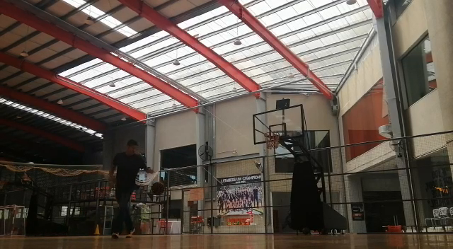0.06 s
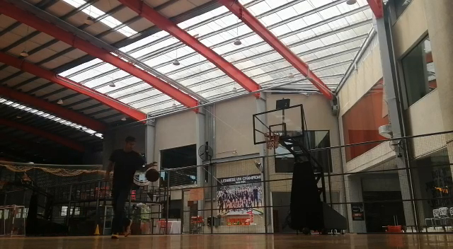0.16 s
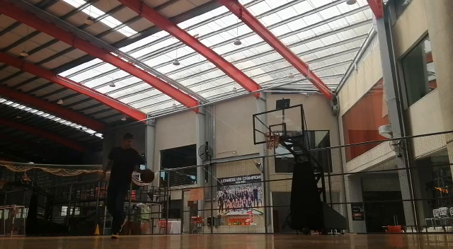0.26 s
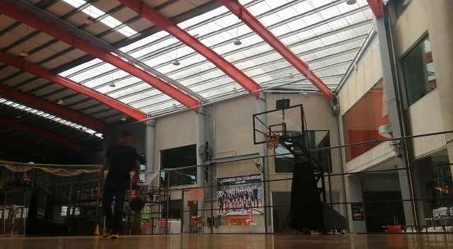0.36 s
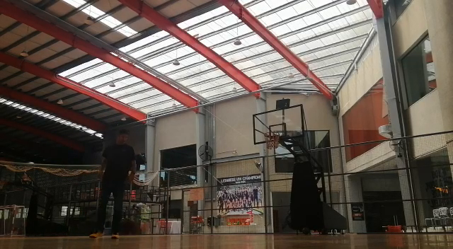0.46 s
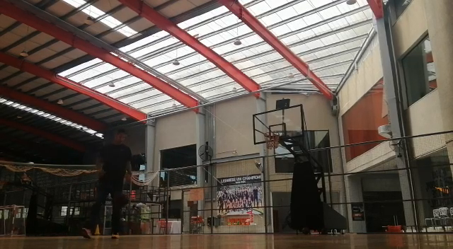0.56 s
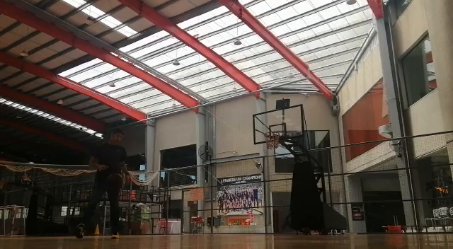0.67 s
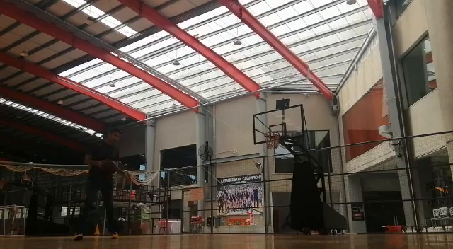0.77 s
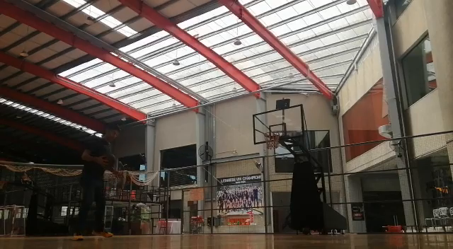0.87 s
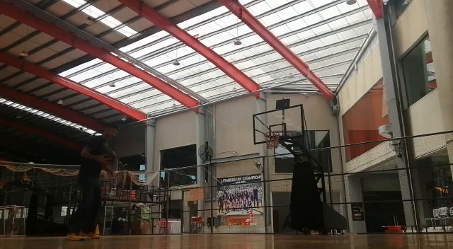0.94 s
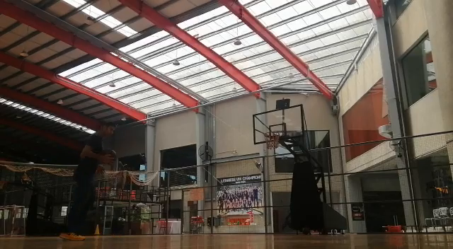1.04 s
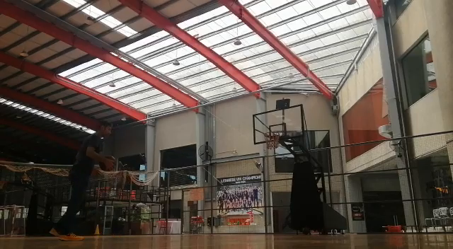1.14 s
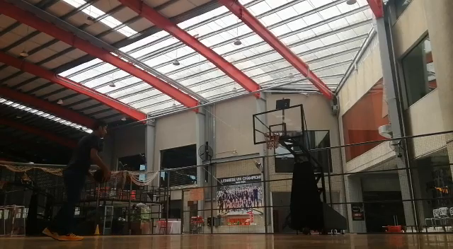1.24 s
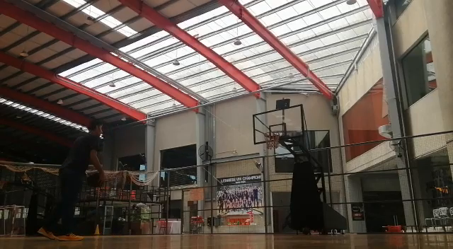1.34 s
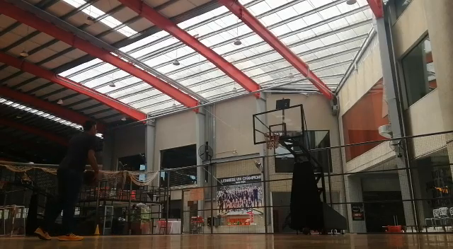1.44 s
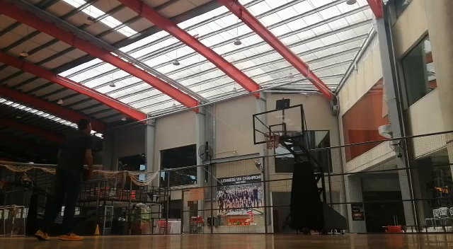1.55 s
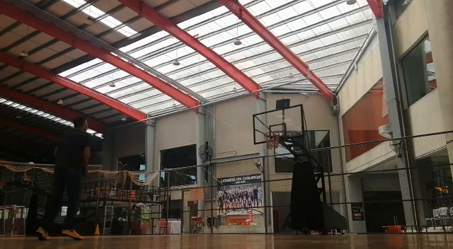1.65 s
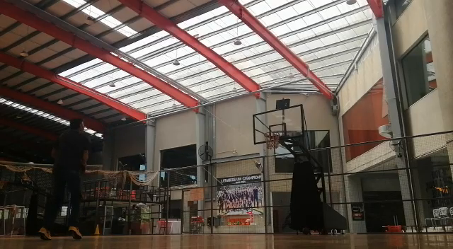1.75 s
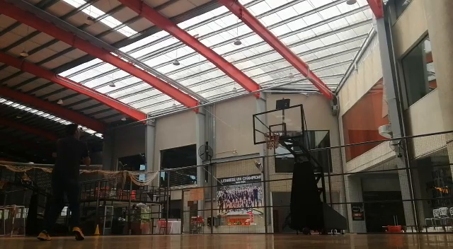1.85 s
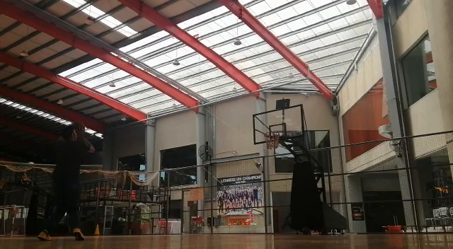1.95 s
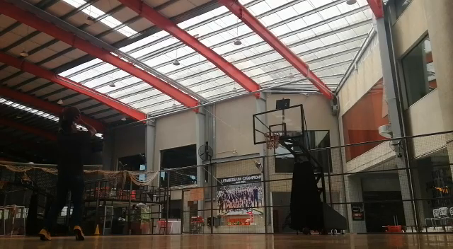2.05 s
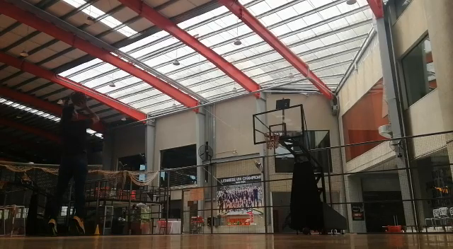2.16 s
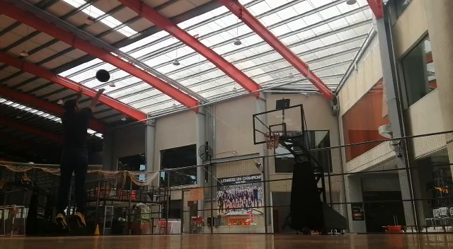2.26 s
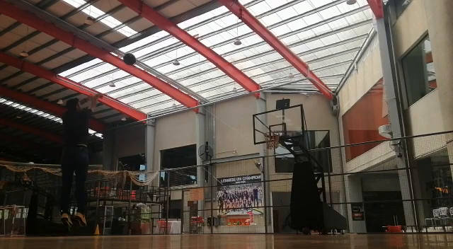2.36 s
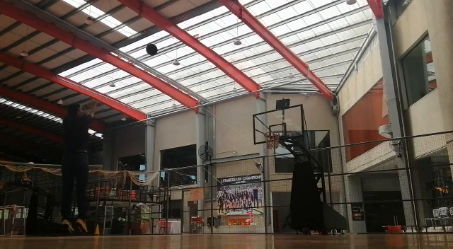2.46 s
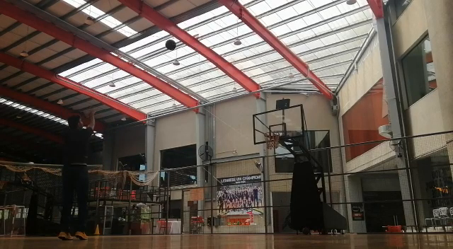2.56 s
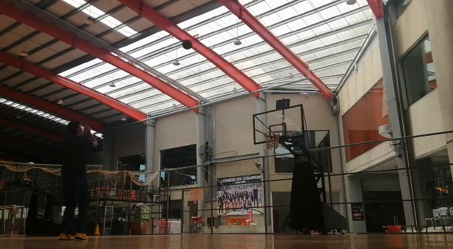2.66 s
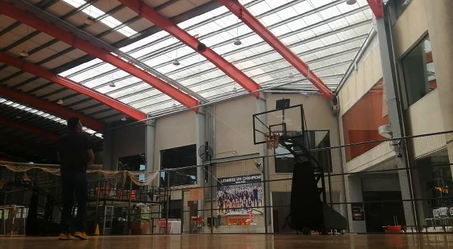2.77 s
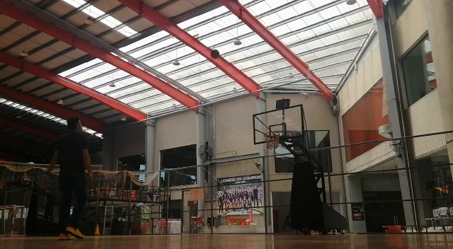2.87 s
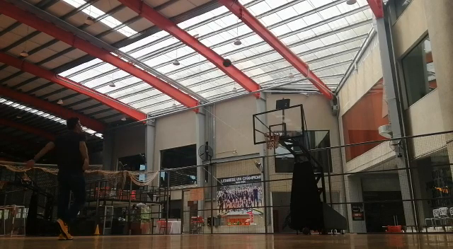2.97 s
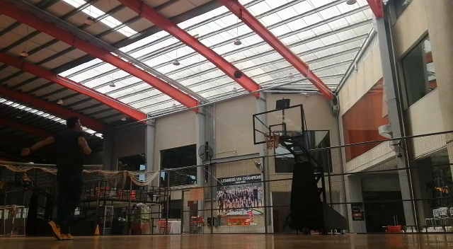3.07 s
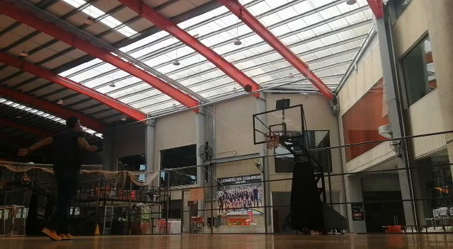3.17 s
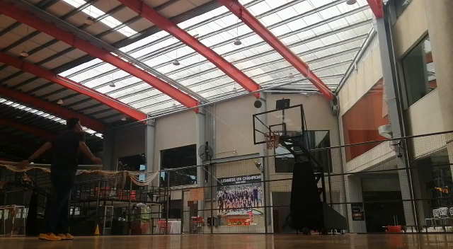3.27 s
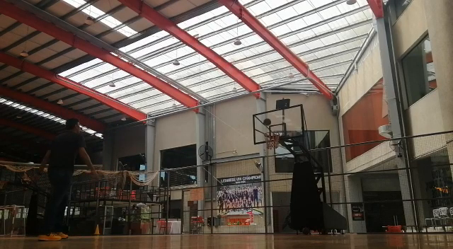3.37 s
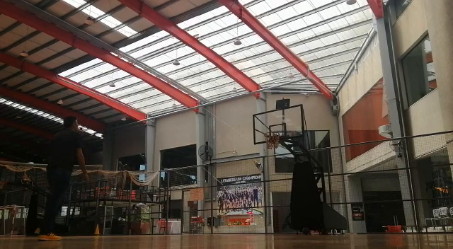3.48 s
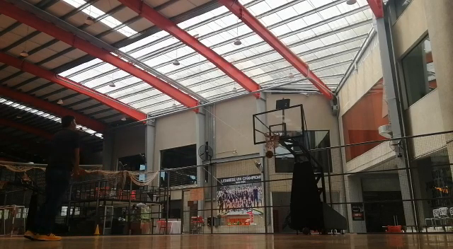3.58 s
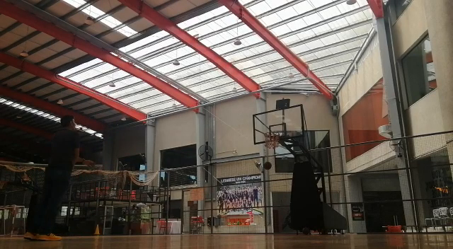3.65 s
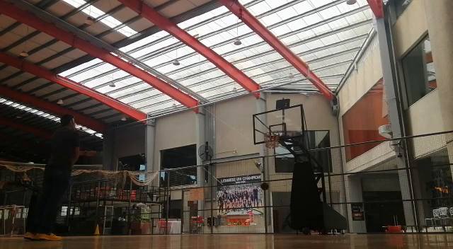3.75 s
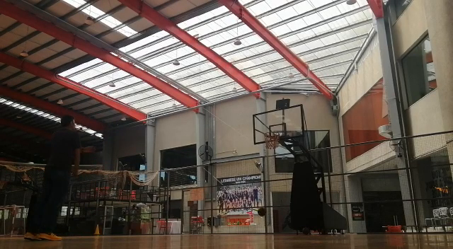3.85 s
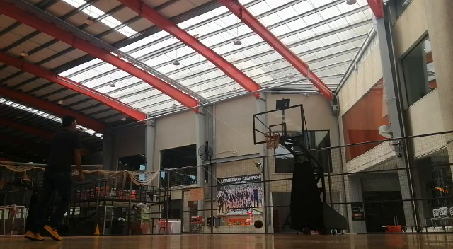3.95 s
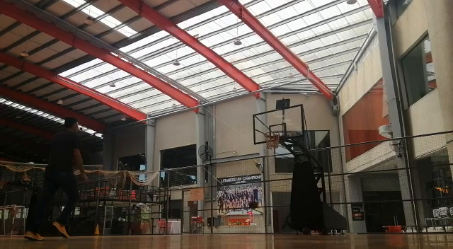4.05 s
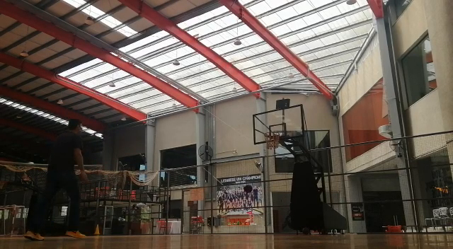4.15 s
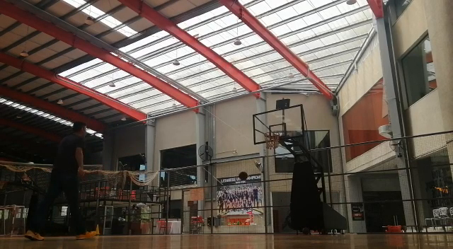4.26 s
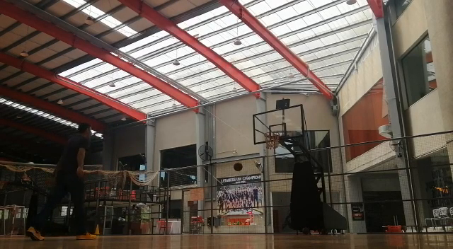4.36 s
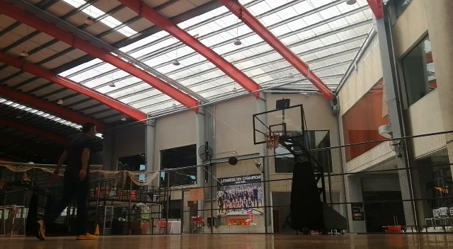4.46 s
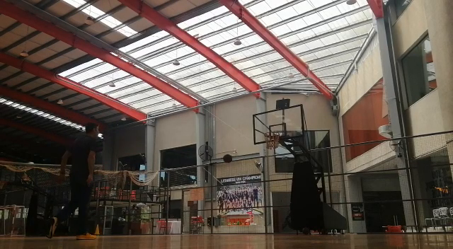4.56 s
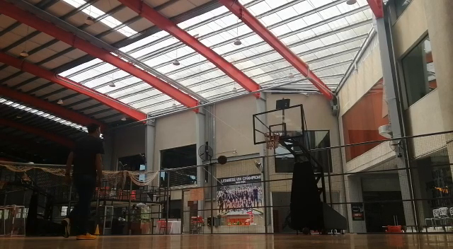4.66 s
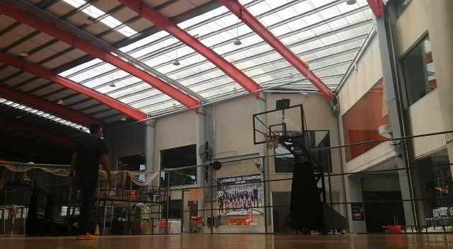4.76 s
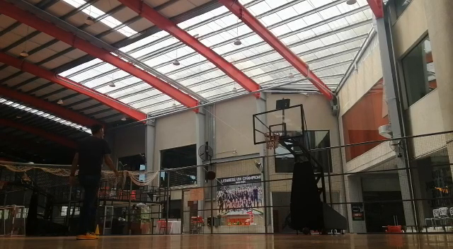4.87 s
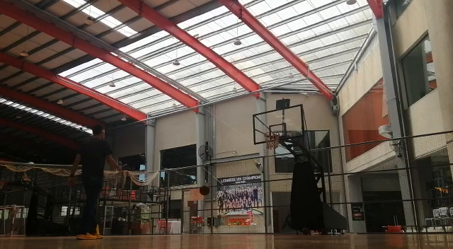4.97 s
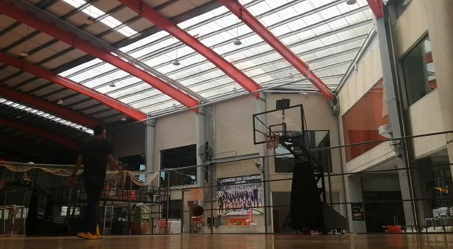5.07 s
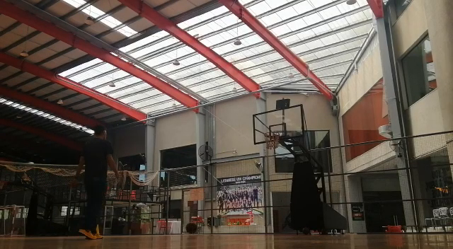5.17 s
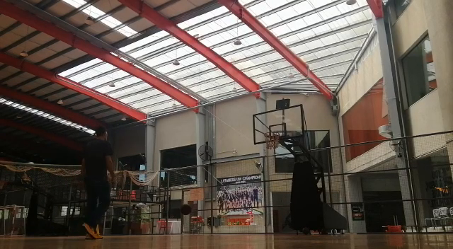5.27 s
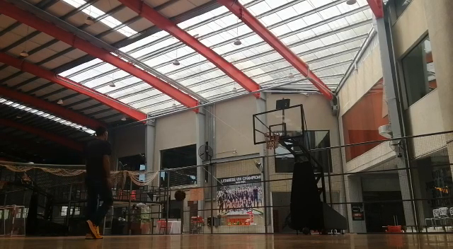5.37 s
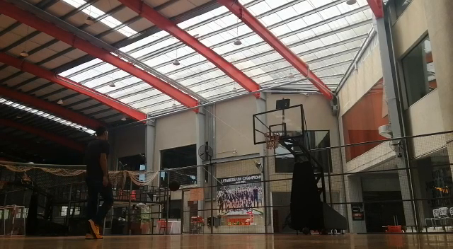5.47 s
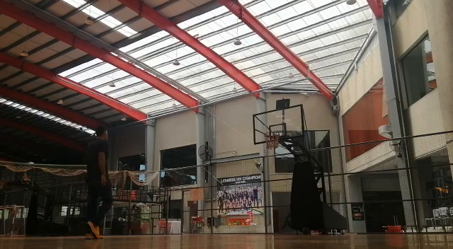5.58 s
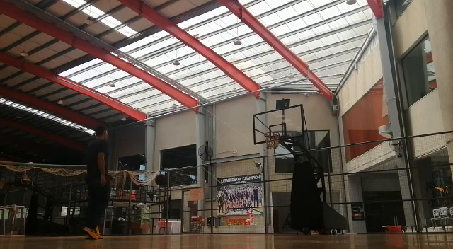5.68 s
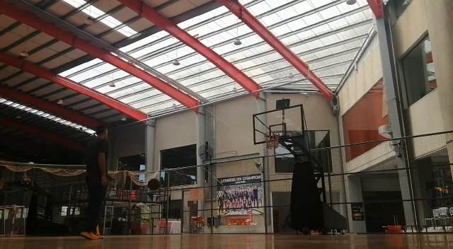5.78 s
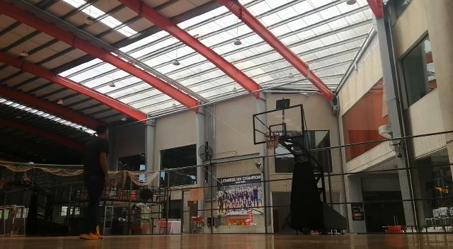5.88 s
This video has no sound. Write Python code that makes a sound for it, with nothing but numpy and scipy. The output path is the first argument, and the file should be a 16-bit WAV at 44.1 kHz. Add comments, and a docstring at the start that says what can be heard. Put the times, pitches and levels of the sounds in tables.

```python
"""A basketball on the sprung wooden floor of a big arched hall, heard from low down at the side of the court.
It is dribbled twice, each blow an air slap, damped floor modes and ringing air inside the ball; a slipping
sole then whistles, feet thud and scuff, and the ball leaves the fingertips with a tick. It clunks on the steel
basket stand and bounces twice, one more step between. Delayed, scattered copies and decaying noise give every
blow its wall echo, floor-roof flutter and reverberation; shaped noise murmurs and a faint sine whines throughout."""
import sys
import numpy as np
from scipy import signal
from scipy.fft import rfft, irfft
from scipy.io import wavfile

SR = 44100
rng = np.random.default_rng(int(sys.argv[2]) if len(sys.argv) > 2 else 0)


def dump_mix(stems):
    """Bounce the given channels to the path in sys.argv[1] as a 16-bit WAV at rate SR."""
    frames = np.atleast_2d(stems).T  # one column per channel
    limited = np.clip(frames, -1, 1)  # hard clip at full scale
    pcm = np.round(limited * 32767).astype(np.int16)
    wavfile.write(sys.argv[1], SR, pcm)


N = 261072

# air squeezed from under the ball or a flat sole: f/Hz, relative level/dB
SLAP_SPECTRUM = [(60, 18), (300, -7), (500, 3.5), (750, -4), (1200, 3.5), (2000, 0), (3000, -1), (4200, -4),
                 (5600, -6.5), (8000, -20.5), (12000, -26.5), (16000, -51)]
# rubber sole meeting the varnish: f/Hz, relative level/dB
SCUFF_SPECTRUM = [(150, 5), (500, 3.5), (800, -10.5), (1300, 2.5), (2100, -10.5), (3000, -12), (5500, -9.5),
                  (8500, -24.5), (12000, -18), (16000, -45)]
# reverberation by band: f/Hz, relative level/dB, t60/s, left-right correlation/1, build-up time/s
HALL_BANDS = [(40, -5, 2.9, 1, 0.022), (82, -0.5, 1.74, 0.96, 0.013), (147, 1.5, 3.86, 1, 0.0043),
              (263, 1.5, 1.8, 0.81, 0.012), (553, 4, 1.51, 0.64, 0.0039), (1210, 0.5, 1.96, -0.21, 0.016),
              (2350, -0.5, 2.24, -0.011, 0.078), (4250, -0.5, 2.18, -0.0091, 0.031),
              (6800, -5, 1.2, 0.09, 0.071), (9000, -3.5, 1.08, 0.31, 0.034), (14000, -9, 0.74, 0.43, 0.025)]

REFERENCE_M = 6   # distance at which a blow on the floor has its nominal level


def from_db(db):
    """Level in decibels to amplitude ratio: 20 dB is a factor of ten."""
    return 10 ** (np.asarray(db) / 20)


def rms_one(x):
    """Normalise to unit root-mean-square amplitude."""
    return x / np.sqrt(np.mean(x ** 2) + 1e-20)


def clock(size=N):
    """Sample times in seconds: uniform sampling."""
    return np.arange(size) / SR


def at_hz(points, hz):
    """Interpolate (f/Hz, value) rows linearly on a log-frequency axis."""
    known, values = np.transpose(points)
    return np.interp(np.log(np.maximum(hz, 1)), np.log(known), values)


def add(out, sound, s):
    """Superpose a sound on the mix from time s."""
    start = max(round(s * SR), 0)
    part = sound[..., :max(out.shape[-1] - start, 0)]
    out[..., start:start + part.shape[-1]] += part


def convolve(x, response):
    """Linear time-invariant response: convolve each channel, cut to the scene's length."""
    return signal.fftconvolve(np.atleast_2d(x), np.atleast_2d(response), axes=-1)[:, :N]


def lowpass(x, hz):
    """Second-order treble loss above a corner frequency."""
    sections = signal.butter(2, min(hz, .45 * SR), fs=SR, output="sos")
    return signal.sosfilt(sections, x + 1e-18)


def pulse(spectrum, tilt_db=0, pivot_hz=1800, size=2048):
    """Minimum phase: the sharpest causal pulse with this spectrum, tilted in dB per octave about a pivot."""
    hz = np.arange(size // 2 + 1) * SR / size
    octaves = np.log2(np.clip(hz / pivot_hz, .5, 4))
    level_db = at_hz(spectrum, hz) + tilt_db * octaves
    # folding the cepstrum onto positive times makes the pulse causal
    cepstrum = irfft(np.log(from_db(level_db)))
    cepstrum[1:size // 2] *= 2
    cepstrum[size // 2 + 1:] = 0
    return irfft(np.exp(rfft(cepstrum)))


def ring(hz, db, t60):
    """Free vibration of one struck mode: a sine that decays by 60 dB in t60 seconds."""
    t = clock(size=SR // 2)
    return from_db(db - 60 * t / t60) * np.sin(2 * np.pi * hz * t)


def crunch(spectrum, t60, tilt_db=0):
    """Rough contact as many tiny impacts: spectrally shaped noise under exponential decay."""
    t = clock(size=SR // 2)
    grains = convolve(rng.standard_normal(len(t)), pulse(spectrum, tilt_db))[0, :len(t)]
    return rms_one(grains) * from_db(-60 * t / t60)


def diffuse(size):
    """Diffuse-field coherence: noise spectra at two close microphones, correlated by frequency band."""
    hz = np.arange(size // 2 + 1) * SR / size
    correlation = np.clip(at_hz(np.array(HALL_BANDS)[:, [0, 3]], hz), -.99, .99)
    mid, side = rfft(rng.standard_normal((2, size)))
    common = np.sqrt((1 + correlation) / 2) * mid
    opposed = np.sqrt((1 - correlation) / 2) * side * [[1], [-1]]
    return hz, common + opposed


def hall(x, hold_s=0.08, first_s=0.0028, patchy_db=2.5, patches_per_s=45, size=131072):
    """Diffuse decay: reverberation builds up, holds, then dies band by band; each call draws its own response."""
    hz, noise = diffuse(size)
    t, centres, response = clock(size), np.array(HALL_BANDS)[:, 0], 0
    for (_, db, t60, _, build_s), band in zip(HALL_BANDS, np.eye(len(HALL_BANDS))):
        # reflections come in clusters early on and merge later
        clusters = np.interp(t * patches_per_s, np.arange(256), rng.standard_normal(256))
        clusters = clusters * np.exp(-t / 0.58)
        fade = from_db(patchy_db * clusters - 60 * np.hypot(t, hold_s) / t60)
        envelope = (1 - np.exp(-np.maximum(t - first_s, 0) / build_s)) * fade
        share = at_hz(np.c_[centres, band], hz)   # one at this band's centre, zero at the next
        response = response + from_db(db) * irfft(noise * share) * envelope / np.linalg.norm(envelope)
    return convolve(x, response)


def near(x, lead_s):
    """Interaural-type time difference: direct sound reaches the left microphone lead_s before the right."""
    t = clock(len(x))
    return np.array([x, np.interp(t - lead_s, t, x, left=0)])


def scattered(top_hz, spread_s, clean, size=4096):
    """Scattering from an uneven surface: a dulled click with a short decaying spray of noise."""
    t = clock(size)
    spray = rng.standard_normal((2, size)) * np.exp(-t / spread_s)
    echo = clean * (t == 0) + spray / np.linalg.norm(spray[0])
    return lowpass(echo, top_hz) / np.hypot(clean, 1)


def space(x, lead_s, wall_s, wall_db, roof_s, roof_db, hall_db, shine_db=-6,
          flutter_s=0.077, flutter_loss_db=3.5, count=6):
    """Superposed paths: direct sound, near wall, floor-roof flutter, far wall and reverberation."""
    echoes = np.zeros((2, SR))
    wall = scattered(top_hz=7300, spread_s=0.0071, clean=0.63)
    add(echoes, from_db([[wall_db - 5.5], [wall_db]]) * wall, wall_s)   # weaker on the left
    for k in range(count):
        bass_db = roof_db - 2 - k * flutter_loss_db
        bass = from_db(bass_db) * scattered(top_hz=316, spread_s=0.019, clean=3.8)
        # the roof trusses break up the treble
        treble_db = shine_db + 0.31 * roof_db - k * 5.3
        treble = from_db(treble_db) * scattered(top_hz=5000, spread_s=0.0096, clean=0.47)
        add(echoes, bass + treble, roof_s + k * flutter_s)
    add(echoes, from_db(-12.5) * scattered(top_hz=1750, spread_s=0.032, clean=0.23), .35)   # far wall
    return near(x, lead_s) + convolve(x, echoes) + from_db(hall_db) * hall(x)


def from_spot(x, distance_m, degrees):
    """Inverse distance law: direct sound falls 6 dB per doubling; bearing to the left sets the delays."""
    wall_db, roof_db, hall_db = -3, -3.5, 1.5   # at the reference distance
    mic_gap_s = 0.0003   # travel time between the microphones
    ahead_wall_s, left_wall_s = 0.0138, 0.011   # wall on the right: from ahead, extra from hard left
    roof_s, sooner_s, focus_db = 0.0563, 0.0103, 2.5   # last two per doubling: the arch focuses far blows
    doublings, left = np.log2(distance_m / REFERENCE_M), np.sin(np.radians(degrees))
    loss_db = 20 * np.log10(distance_m / REFERENCE_M)
    # raising echoes by the loss keeps the near wall and the reverberation at constant level
    heard = space(x, lead_s=mic_gap_s * left, wall_s=ahead_wall_s + left_wall_s * left,
                  wall_db=wall_db + loss_db, roof_s=roof_s - sooner_s * doublings,
                  roof_db=roof_db + loss_db + focus_db * doublings, hall_db=hall_db + loss_db)
    return from_db(-loss_db) * heard


def whine(hz=13000, db=-100):
    """Steady pure tone: a faint electronic whine."""
    return from_db(db) * np.sin(2 * np.pi * hz * clock())


def rumble(rumble_db=-46):
    """Stationary diffuse noise: the steady low murmur of air in the building."""
    # air murmur: f/Hz, relative spectral level/dB
    murmur_spectrum = [(22, -16), (45, -13.5), (64, -4.5), (82, 0), (118, -12), (190, -14.5), (280, -23),
                       (480, -32.5), (800, -32), (1300, -36.5), (3700, -50.5), (7000, -64.5), (9500, -71),
                       (16000, -77.5)]
    hz, noise = diffuse(N)
    murmur = irfft(noise * from_db(at_hz(murmur_spectrum, hz)), N)
    return from_db(rumble_db) * rms_one(murmur)


def footsteps(distance_m=4.4, degrees=39):
    """Modal excitation by weight: the floor thuds, the sole slaps, knocks on a board and scuffs."""
    # feet on the boards: t/s, thud level/dB, sole knock level/dB, scuff level/dB
    steps = [(1.169, -40.5, -61, -52.5), (1.405, -38.5, -41.5, -38.5), (1.908, -38.5, -45.5, -48.5),
             (2.215, -38.5, -53, -70), (2.514, -51, -68, -73), (2.665, -64, -32.5, -50.5),
             (3.392, -35.5, -61, -78), (4.864, -43, -65, -52.5)]
    firm_tilt_db, firm_db, tilt_per_db = -2.6, -33.5, 0.2   # lighter scuffs are duller; tilt in dB per octave
    x = np.zeros(N)
    for s, thud_db, knock_db, scuff_db in steps:
        thud = ring(84.0, thud_db, 0.2) + ring(163.6, thud_db - 12.0, 0.15)
        knock = ring(494, knock_db, 0.017) - ring(1046, knock_db - 11.5, 0.029)
        knock = knock + ring(1420, knock_db - 4.5, 0.012)
        # air squeezed from under a flat sole
        slap = from_db(knock_db - 14) * crunch(SLAP_SPECTRUM, t60=0.1, tilt_db=-3.0)
        tilt_db = firm_tilt_db + tilt_per_db * (scuff_db - firm_db)
        scuff = from_db(scuff_db) * crunch(SCUFF_SPECTRUM, t60=0.069, tilt_db=tilt_db)
        add(x, thud + knock + slap + scuff, s)
    return from_spot(x, distance_m, degrees)


def squeak(waver=0.0026, second_db=-26, third_db=-39):
    """Frictional slip of rubber on varnish: an unsteady whistle whose overtones strengthen with its level."""
    # slips of the sole: t/s, length/s, f/Hz, level/dB
    slips = [(1.059, 0.031, 4110, -40), (1.119, 0.026, 4255, -30.5), (1.153, 0.015, 4253, -33.5)]
    sharp_hz, settle_s = 200, 0.0031   # each slip starts sharp and settles
    x, hardest_db = np.zeros(N), max(db for *_, db in slips)
    for s, length_s, hz, db in slips:
        t = clock(size=SR // 10)
        unsteady = 1 + waver * rms_one(lowpass(rng.standard_normal(len(t)), 250))
        pitch = (hz + sharp_hz * np.exp(-t / settle_s)) * unsteady
        phase = 2 * np.pi * np.cumsum(pitch) / SR
        level = from_db(db) * np.sin(np.pi * np.minimum(t / length_s, 1)) ** 2
        overtones = from_db(second_db) * np.sin(2 * phase) + from_db(third_db) * np.sin(3 * phase)
        add(x, level * (np.sin(phase) + level / from_db(hardest_db) * overtones), s)
    return space(x, lead_s=0.000213, wall_s=0.014, wall_db=1, roof_s=0.059, roof_db=-5.5,
                 hall_db=-1.5, shine_db=0.5)


def release(s=2.269, db=-43.5):
    """Light contact excites short damped modes: the ball rolls off the fingertips with a small tick."""
    x = np.zeros(N)
    tick = ring(2960, db, 0.0056) + ring(4660, db - 12.0, 0.006)
    rub = from_db(db - 14) * crunch(SCUFF_SPECTRUM, t60=.04, tilt_db=-3.5)
    add(x, tick + rub, s)
    return space(x, lead_s=0.00024, wall_s=0.023, wall_db=-9, roof_s=0.035, roof_db=-12,
                 hall_db=-8, shine_db=-16)


def basket_stand(s=3.614):
    """Modal superposition: the padded steel frame clunks hollowly and its fittings clatter."""
    # modes of the frame: f/Hz, level/dB, t60/s
    stand_modes = [(100, -20, 0.051), (150.3, -22.5, 0.12), (197, -23, 0.079), (273, -25.5, 0.043),
                   (401, -23, 0.064), (464, -25, 0.024), (568, -33, 0.052), (1076, -26, 0.026),
                   (1273, -27.5, 0.026), (1440, -38, 0.044), (1470, -42, 0.021), (1900, -50, 0.06)]
    # clatter of the fittings: f/Hz, relative level/dB
    clatter_spectrum = [(200, -5), (700, 2.5), (1400, 1.5), (2200, -7.5), (3500, -12), (6000, -19),
                        (8500, -26), (12500, -29.5), (16000, -57)]
    x = np.zeros(N)
    clunk = sum((-1) ** k * ring(*mode) for k, mode in enumerate(stand_modes))   # alternating polarity
    add(x, clunk, s)
    add(x, from_db(-34) * crunch(clatter_spectrum, t60=0.18), s)
    return space(x, lead_s=.00002, wall_s=.0155, wall_db=-1.5, roof_s=0.064, roof_db=-4.0, hall_db=1.5)


def hollowed(spectrum, hollow_hz, hollow_db, octaves=0.15):
    """Partial cancellation: the ball's shell hollows the slap at a pitch set by how it lands."""
    hz = np.geomspace(spectrum[0][0], spectrum[-1][0], 200)
    dip = np.exp(-(np.log2(hz / hollow_hz) / octaves) ** 2)
    return np.c_[hz, at_hz(spectrum, hz) + hollow_db * dip]


def bounce(thump_db, thump_hz, board_db, slap_db, tilt_db, hollow_hz, hollow_db=-4):
    """Impulsive excitation: air slaps and boards knock, the floor heaves, air in the ball pings."""
    # air inside the ball: f/Hz, level relative to the slap/dB, t60/s
    ball_modes = [(939, -44, 0.86), (1285, -46.5, 0.24), (1384, -31, 0.077), (2522, -33, 0.055),
                  (2576, -33, 0.078), (2820, -72, 0.3), (3065, -40.5, 0.26), (3250, -85, .2),
                  (3840, -47, 0.34), (4900, -52, 0.13), (5090, -69, 0.14)]
    out = -ring(1270, board_db, 0.0076)
    out = out - ring(234.0, thump_db - 8.5, 0.024) - ring(463, thump_db - 15, 0.017)
    slap = pulse(hollowed(SLAP_SPECTRUM, hollow_hz, hollow_db), tilt_db)
    add(out, -from_db(slap_db) * slap / np.abs(slap).max(), 0)
    add(out, ring(thump_hz, thump_db, 0.05), .0013)
    # the sprung floor booms on
    add(out, ring(84.0, thump_db - 11.0, 0.33) + ring(36, thump_db - 20, 0.14), .003)
    pings = sum(ring(hz, slap_db + db + rng.normal(0, 1), t60) for hz, db, t60 in ball_modes)
    return out + pings


def dribbles():
    """Impact and friction: each bounce from its own spot, with fine grit of pebbled rubber on varnish."""
    # ball on floor: t/s, force/dB, distance/m, bearing to the left/degrees, floor thump f/Hz,
    # board knock level/dB, slap tilt/(dB per octave), slap hollow f/Hz
    landings = [(0.0046, -1.5, 6.04, 12.5, 104.6, -12.5, -3, 3430),
                (0.5932, -1.0, 5.77, 29.3, 93.5, -22.5, -1.5, 2010),
                (4.0851, 7, 11, 2.4, 120, -19, -1.5, 594),
                (5.3112, 0.5, 8.77, 15.6, 101.5, -19.5, -1.1, 1610)]
    # levels at force 0 dB; a harder bounce gains more slap than thump
    slap_0_db, thump_0_db, thump_follows = -10, -14.5, 0.46
    out = np.zeros((2, N))
    for s, force_db, distance_m, degrees, thump_hz, board_db, tilt_db, hollow_hz in landings:
        slap_db, thump_db = slap_0_db + force_db, thump_0_db + thump_follows * force_db
        x = np.zeros(N)
        add(x, bounce(thump_db, thump_hz, board_db, slap_db, tilt_db, hollow_hz), s)
        out += from_spot(x, distance_m, degrees)
        # independent grit in each channel
        grit = np.array([crunch(SLAP_SPECTRUM, t60=0.038, tilt_db=tilt_db) for ear in range(2)])
        add(out, from_db(slap_db - 16.0) * REFERENCE_M / distance_m * grit, s)
    return out


def scene():
    """Linear superposition of the background, the player and the ball."""
    background = whine() + rumble()
    player = footsteps() + squeak() + release()
    return background + player + basket_stand() + dribbles()


def record(dry, cutoff_hz=15300):
    """Transducer response: the right microphone is louder up to about 8 kHz, weaker above; the top is cut."""
    # the two microphones: f/Hz, left level/dB, right level/dB
    mic_levels = [(60, -2, 3), (382, -2.5, 2.5), (1310, -3.5, 0.5), (2860, 1, 3.5), (4110, -3.5, 3.5),
                  (7440, 4.5, 9.5), (8970, 3.5, -1.5), (11500, 8, -2)]
    hz, left_db, right_db = np.transpose(mic_levels)
    responses = np.array([pulse(np.c_[hz, db]) for db in (left_db, right_db)])
    heard = convolve(dry, responses)
    top_cut = signal.ellip(10, .1, 80, cutoff_hz, fs=SR, output="sos")
    return signal.sosfilt(top_cut, heard)


dry = scene()
out = record(dry)
dump_mix(out)
```